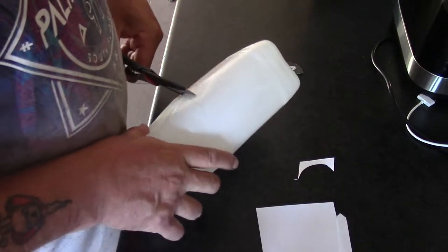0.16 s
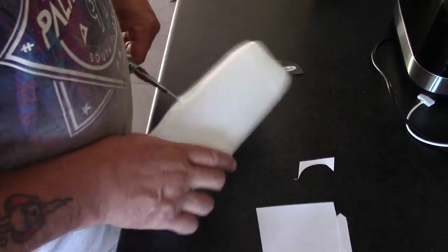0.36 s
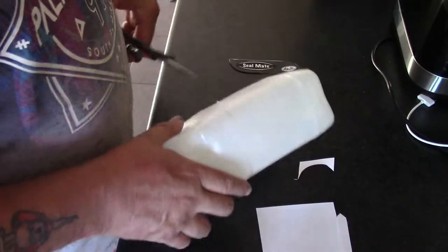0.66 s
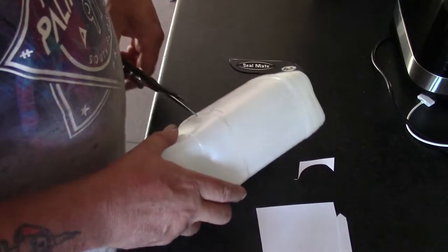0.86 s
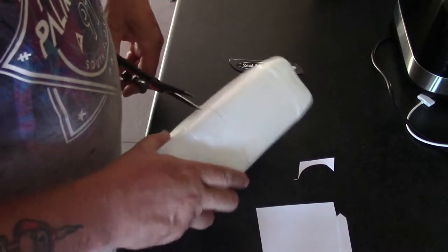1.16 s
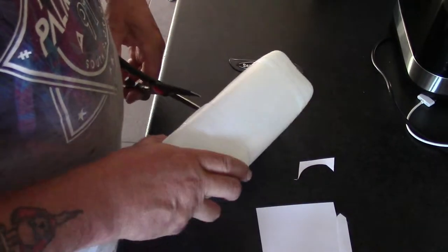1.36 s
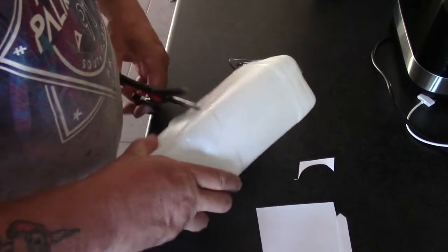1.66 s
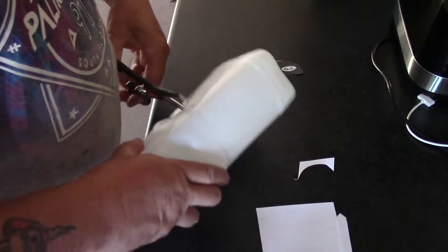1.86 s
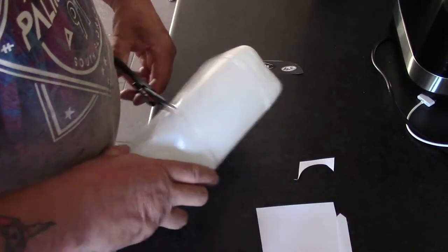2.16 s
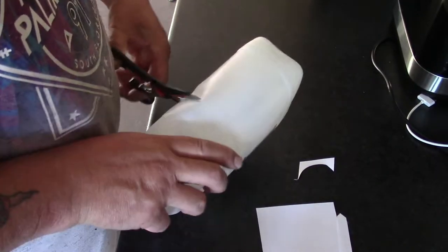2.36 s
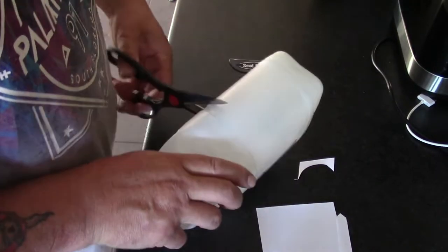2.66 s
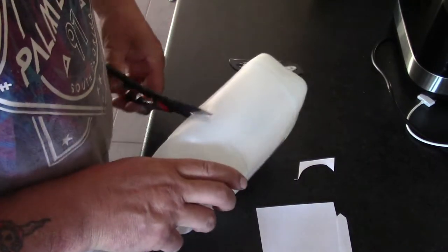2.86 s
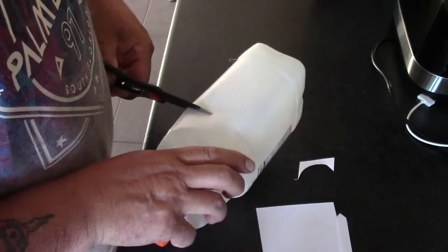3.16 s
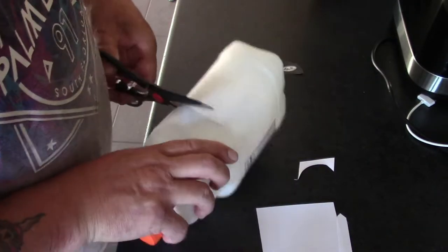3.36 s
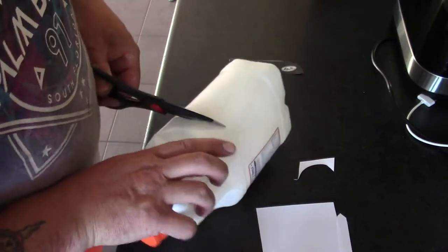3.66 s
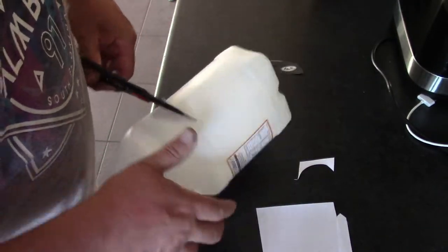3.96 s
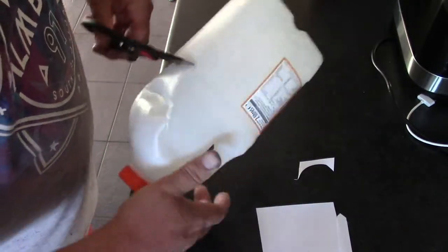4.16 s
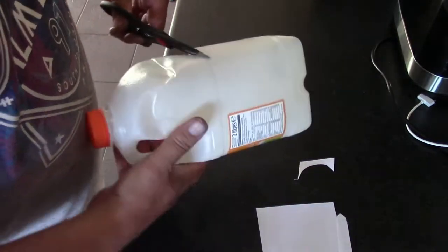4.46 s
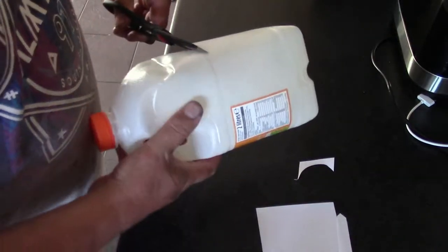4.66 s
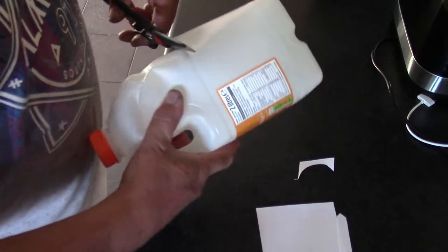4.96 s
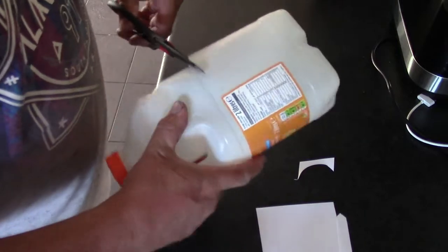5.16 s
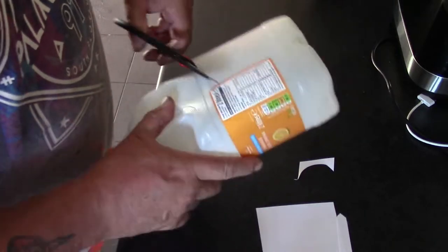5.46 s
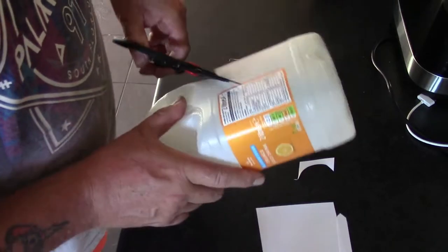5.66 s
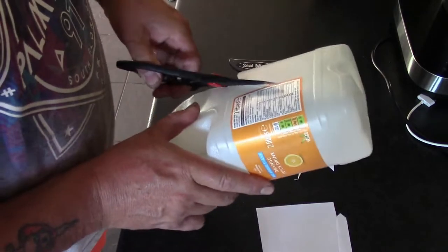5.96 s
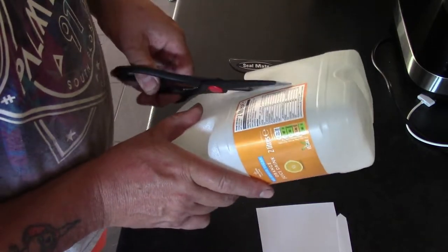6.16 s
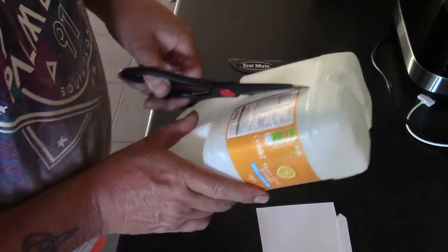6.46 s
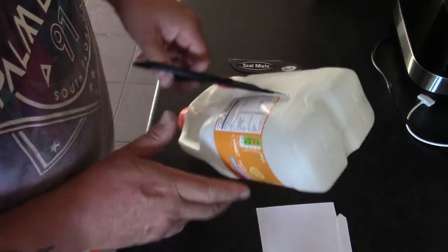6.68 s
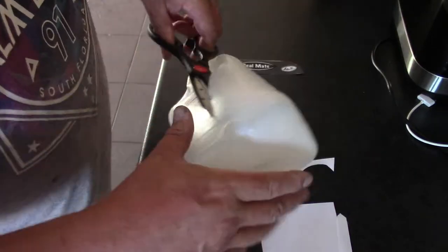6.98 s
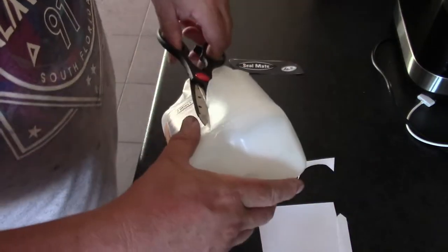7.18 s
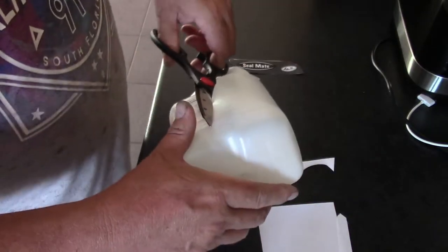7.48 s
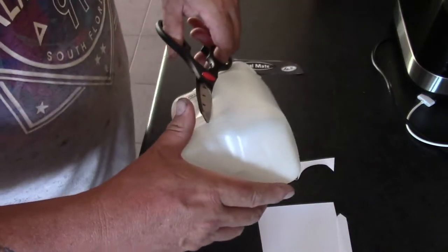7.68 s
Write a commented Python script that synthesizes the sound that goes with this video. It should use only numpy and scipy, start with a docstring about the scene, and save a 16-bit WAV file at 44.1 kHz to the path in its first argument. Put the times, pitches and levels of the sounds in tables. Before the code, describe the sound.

Irregular crunching and sudden hollow snaps come from an empty plastic jug being cut with scissors, about an arm's length from the microphone. Loud cracks arrive in clusters from the start, with fine crackling and a few brief metallic blade slides between them, then ease into gentler tearing and one last strong snap. The kitchen rings briefly after each break, over a faint steady hush.

```python
"""Thin plastic crunches, then snaps loudly: scissors cut an empty jug at arm's length in a hard kitchen.
The wall snaps and tears; each break booms in the hollow body, rattles the wall and cracks at the
blade tips. Between breaks the wall crunches in tiny slips and the steel blades slide on each other.
The room rings on over a faint hush."""
import sys
import numpy as np
from scipy import signal
from scipy.fft import rfft, irfft
from scipy.io import wavfile
from scipy.ndimage import uniform_filter1d

SR = 44100
rng = np.random.default_rng(int(sys.argv[2]) if len(sys.argv) > 2 else 0)


def unload_wav(signal):
    """Save mono or channel-first audio to the path in sys.argv[1] as 16-bit WAV at rate SR, clipped to [-1, 1]."""
    wavfile.write(
        sys.argv[1],
        SR,
        np.round(np.clip(np.atleast_2d(signal).T, -1, 1) * 32767).astype(np.int16),
    )


N = 344862


def undb(db):
    """dB to amplitude gain."""
    return 10 ** (np.asarray(db) / 20)


def level(x, db):
    """Scale to an rms level."""
    return x * undb(db) / np.sqrt(np.mean(x ** 2))


def curve(rows, column):
    """Table column, interpolated per sample."""
    rows = np.array(rows)
    return np.interp(np.arange(N) / SR, rows[:, 0], rows[:, column])


def wander(rate_hz):
    """Random levels, held and slewed; spread near 1."""
    hold = int(SR / rate_hz)
    steps = np.repeat(rng.standard_normal(N // hold + 1), hold)
    return uniform_filter1d(steps, size=hold // 2)[:N]


def grit(shape, rate_hz, spread_db):
    """Tiny slips of random sign, a few much larger than the rest."""
    slips = (rng.random(shape) < rate_hz / SR) * rng.standard_normal(shape)
    return slips * undb(spread_db * rng.exponential(size=shape))


def soften(x, cutoff_hz):
    """Low-pass: a broad, blunt push carries no treble."""
    return signal.lfilter(*signal.butter(2, cutoff_hz, fs=SR), x, axis=-1)


def ring(x, modes, near_hz=None, db_per_oct2=0, flip_chance=0):
    """Sum of resonances; a blow drives modes far from near_hz less, and some in reverse."""
    out = 0
    for k, (hz, width_hz, db) in enumerate(modes):
        gain = (-1) ** k * undb(db)
        if near_hz is not None:
            octaves = np.log2(hz / near_hz[:, None])
            polarity = np.sign(rng.random((len(x), 1)) - flip_chance)
            gain = gain * undb(-db_per_oct2 * octaves ** 2) * polarity
        out = out + gain * signal.lfilter(*signal.iirpeak(hz, hz / width_hz, SR), x, axis=-1)
    return out


# noise floor spectrum: (frequency [Hz], relative density [dB])
HUSH_SPECTRUM = [(30, -10), (100, -12), (190, -15), (350, -8), (850, -10), (1800, -10.5), (4000, -14.5),
                 (10000, -31), (16000, -34)]


def hush():
    """Room tone and hiss: steady shaped noise."""
    hz, db = np.transpose(HUSH_SPECTRUM)
    bin_hz = np.fft.rfftfreq(N, 1 / SR) + 1
    gain = undb(np.interp(np.log(bin_hz), np.log(hz), db))
    return level(irfft(rfft(rng.standard_normal(N)) * gain, N), db=-54)


# room decay: (band [Hz], T60 [s])
ROOM_DECAY = [(150, 0.33), (400, 0.54), (1200, 0.57), (3500, 0.56), (9000, 0.17), (14000, 0.29)]


def echoes():
    """Dense echoes start after the first wall and die band by band."""
    t, tail = np.arange(SR) / SR, 0
    for hz, t60_s in ROOM_DECAY:
        bandpass = signal.butter(1, [hz / 1.37, min(hz * 2.4, .45 * SR)], "band", fs=SR)
        band = signal.lfilter(*bandpass, rng.standard_normal(SR))
        tail = tail + band * undb(-60 * t / t60_s)
    tail *= np.clip((t - .003) / .0064, 0, 1)
    return tail / np.sqrt(np.mean(tail[SR // 100:SR // 25] ** 2) * SR / 25)


def room(x, tails=16, gain_db=-9.5):
    """Room echo, crossfaded between random tails so it sounds smooth rather than metallic."""
    tail_index = np.arange(N) / N * (tails - 1)
    fades = (np.cos(np.pi / 2 * np.clip(tail_index - k, -1, 1)) for k in range(tails))
    return undb(gain_db) * sum(signal.fftconvolve(x * fade, echoes())[:N] for fade in fades)


# blade resonances: (frequency [Hz], width [Hz], gain [dB])
STEEL_MODES = [(2700, 1100, 12.6), (3780, 990, 14.5), (5660, 260, 11), (6950, 2300, 2.3), (9800, 1500, 2.6),
               (10600, 950, 1.2)]
# blade on blade: (start [s], end [s], level [dB])
BLADE_SLIDES = [(0.005, 0.152, -46.5), (.74, 1.1, -39.5), (4.32, 4.617, -52), (5.583, 5.803, -47),
                (6.063, 6.1, -49.5), (6.393, 6.46, -56.5), (7.43, 7.547, -50.5)]


def blades(attack_s=.064, release_s=.13):
    """Fine rubbing rings the steel in bands with dark gaps between them."""
    t = np.arange(N) / SR
    gain = sum(undb(db) * np.interp(t, [start - attack_s, start, end, end + release_s], [0, 1, 1, 0])
               for start, end, db in BLADE_SLIDES)
    rub = grit(N, rate_hz=9000, spread_db=.76)
    # two passes per mode deepen the gaps
    steel = sum(ring(ring(rub, [(hz, width, 0)]), [(hz, width, db)]) for hz, width, db in STEEL_MODES)
    return uniform_filter1d(gain, size=1500) * level(steel, 0)


# body (boom), wall (rattle), edge (crack) modes: (frequency [Hz], width [Hz], gain [dB])
BODY_MODES = [(169, 122, -8.5), (283, 48, -6.5), (375.2, 49.7, 4.5), (417.6, 68, -2.5), (533, 110, -7.5),
              (596.7, 117, -3.5), (769, 65, -4), (931, 200, -2.5)]
WALL_MODES = [(907, 300, 9.5), (1161, 210, 7.5), (1546, 323, 1.5), (2040, 310, -0.5), (2013, 49, -5),
              (2264, 86, -1.5), (2620, 1200, -0.5), (3600, 2370, -0.5)]
EDGE_MODES = [(3950, 1560, 4), (5650, 1920, 3), (7370, 1750, 0.5), (9480, 2730, -2), (12000, 3000, -22),
              (14000, 4800, -23.5)]
# steady crunch of wall and hands: (time [s], boom level [dB], brightness [dB per part])
STEADY_CRUNCH = [(0, -29, -1), (.2, -59.5, 11.5), (.45, -36, -7), (.62, -43.5, 6.5), (1.1, -39, 0),
                 (1.46, -59, 11), (1.62, -41.5, -3), (1.9, -49.5, 1.5), (2.07, -67, -1.5), (2.2, -50, -5),
                 (2.55, -39.5, 5.5), (2.77, -26.5, -2.5), (3.1, -58, 7.5), (3.3, -43, 2), (3.75, -30, 0),
                 (4.04, -41, -6), (4.3, -40, 4.5), (4.62, -53, 0), (4.83, -29, 2), (5.12, -33, -1.5),
                 (5.45, -37.5, 3.5), (6.14, -39.5, 5.5), (6.25, -51, -14), (6.5, -29.5, 0),
                 (6.77, -52, 3.5), (7.05, -50.5, 3), (7.32, -35, 0), (7.64, -58.5, 9), (7.82, -70, 1)]


def crunch(swell_db=3, settle_peak_s=.024):
    """One stream of slips shakes body, wall and edge, harder while the wall settles after a break."""
    grip = undb(swell_db * wander(rate_hz=25))  # the grip shifts, so the crunch comes and goes
    slips = grit(N, rate_hz=5000, spread_db=1.2) * grip
    boom = ring(soften(slips, cutoff_hz=1570), BODY_MODES)
    rattle = ring(soften(slips, cutoff_hz=3700), WALL_MODES)
    crack = ring(slips, EDGE_MODES)
    start_s, *break_db = BREAKS.T[:4]
    starts = (start_s * SR).astype(int)
    age = np.arange(SR // 2) / SR / settle_peak_s
    settle_shape = (age * np.exp(1 - age)) ** 2
    steady_db, bright_db = curve(STEADY_CRUNCH, 1), curve(STEADY_CRUNCH, 2)
    parts = (boom, 0, -17), (rattle, -9.5, -11), (crack, -21, -26.5)
    out = 0
    for k, (part, steady_offset_db, settle_offset_db) in enumerate(parts):
        impulses = np.bincount(starts, undb(2 * (break_db[k] + settle_offset_db)), N)
        settle_power = np.abs(signal.fftconvolve(impulses, settle_shape)[:N])
        steady_power = undb(2 * (steady_db + steady_offset_db + k * bright_db))
        out = out + np.sqrt(steady_power + settle_power) * level(part, 0)
    return out


# boom centre, sinking while the cut runs past the handle: (time [s], frequency [Hz])
BOOM_CENTRE = [(0, 592), (2.5, 613), (4.2, 518), (5.4, 565), (5.8, 430), (7.0, 486), (7.4, 580)]
# sudden snaps: (time [s], boom [dB], rattle [dB], crack [dB], rattle centre [Hz], crack decay [ms])
WALL_SNAPS = [(.024, -25, -29.5, -44, 1690, 8.1), (.218, -14, -13, -37, 1980, 14.4),
              (.308, -14, -22.5, -32, 2040, 9), (.384, -10, -12, -19, 1220, 14),
              (.403, -15, -14.5, -44, 1390, 8.1), (.534, -36, -32, -44, 1650, 8),
              (.685, -38, -34.5, -55, 1350, 6.1), (.811, -33, -33, -51, 2100, 11),
              (.882, -24.5, -25.5, -36.5, 1730, 6.9), (1.18, -12.5, -16.5, -30, 1690, 3),
              (1.212, -17, -18, -40, 1970, 6.5), (1.352, -33.5, -27, -56, 1570, 4.8),
              (1.505, -38, -29.5, -37, 2970, 2.9), (1.518, -29.5, -13.5, -13, 2630, 11),
              (1.59, -23, -25, -45, 1870, 9.1), (1.753, -23.5, -34, -62, 1740, 20),
              (1.781, -20.5, -25, -37, 1590, 7.5), (2.021, -47, -58, -58, 2230, 6),
              (2.099, -71, -55, -57, 1400, 7), (2.112, -8.5, -13.5, -26.5, 1130, 7.2),
              (2.222, -22, -27, -37, 2170, 5.3), (2.246, -23, -28.5, -39, 1770, 19),
              (2.281, -26.5, -29, -49, 1740, 3), (2.443, -27, -27, -38, 1850, 4.4),
              (2.623, -30, -26, -40, 2510, 4), (2.692, -10.5, -12, -13, 2620, 7.7),
              (2.711, -22, -16, -16.5, 2360, 15), (3.033, -25, -61, -49, 1620, 7.1),
              (3.137, -13, -19.5, -23.5, 1270, 8), (3.198, -12, -17.5, -26.5, 1720, 3.3),
              (3.588, -30, -29.5, -35, 1410, 11), (3.644, -15, -19.5, -25.5, 1780, 8.3),
              (3.743, -25.5, -33, -44, 1960, 8.5), (3.8, -52, -53, -44, 1770, 9.6),
              (3.869, -23, -25, -37.5, 1560, 8.5), (3.886, -16.5, -23.5, -40, 1260, 10),
              (3.906, -13, -31, -48, 1500, 4.4), (4.006, -28, -55, -72, 1060, 4.1),
              (4.074, -29, -22.5, -24, 2330, 7.2), (4.252, -32.5, -29.5, -60, 1530, 5.7),
              (4.272, -32, -42, -66, 1640, 4.2), (4.311, -35, -36, -37, 1920, 5.9),
              (4.336, -28.5, -57, -70, 1750, 14), (4.475, -29.5, -39, -56, 1500, 10),
              (4.642, -29.5, -34.5, -43.5, 2000, 35), (4.671, -9.5, -8.5, -22.5, 1550, 4),
              (4.855, -12, -14.5, -59, 1320, 4.5), (4.889, -13, -28, -48, 1810, 7.9),
              (5.136, -15.5, -10.5, -16, 1800, 7.3), (5.168, -10, -12.5, -17, 1510, 11.6),
              (5.398, -28, -18, -38, 2040, 4), (5.491, -42, -45, -41, 2000, 6),
              (5.561, -21.5, -33, -43.5, 1550, 7.7), (5.735, -38.5, -43, -46, 1920, 18),
              (5.948, -46, -44, -62, 1430, 6), (6.157, -56, -42, -39, 2270, 3.7),
              (6.197, -39.5, -40, -42.5, 2040, 6), (6.476, -28, -33, -35, 1630, 19),
              (6.615, -34, -45, -50.5, 1450, 18), (6.726, -55, -48, -55, 1490, 4.5),
              (6.789, -38.5, -48, -70, 1910, 8.5), (7.078, -35.5, -42.5, -49, 2300, 9.8),
              (7.103, -33, -32.5, -45.5, 1860, 5.6), (7.262, -30.5, -41, -51, 1300, 37),
              (7.343, -12.5, -24, -67, 1190, 4.4)]
# tears that build up: (time [s], boom [dB], rattle [dB], crack [dB], rattle centre [Hz], rise [s])
WALL_TEARS = [(.268, -25, -25, -38, 1650, .01), (.57, -58, -55, -47, 2010, 0.014),
              (.42, -19.5, -18.5, -46, 1420, 0.047), (1.031, -31.5, -30, -48, 2820, 0.02),
              (1.075, -29, -28, -39, 1860, 0.027), (1.165, -16.5, -28, -38, 1670, 0.023),
              (1.875, -29, -37, -48, 1660, .017), (1.895, -26.5, -35.5, -43.5, 1460, 0.023),
              (2.126, -12.5, -17.5, -24.5, 1750, 0.005), (2.481, -47, -50, -50, 1650, 0.017),
              (2.52, -55, -52, -55, 1900, .02), (2.594, -26.5, -26.5, -33.5, 2560, 0.019),
              (2.856, -28, -27, -33.5, 2290, 0.015), (2.91, -36, -35, -42.5, 2040, 0.021),
              (3.047, -48, -40.5, -41.5, 1890, 0.019), (3.299, -17.5, -22.5, -33, 1600, 0.03),
              (3.335, -16.5, -17, -25.5, 1850, 0.034), (3.431, -25.5, -25.5, -39, 1660, 0.025),
              (3.455, -33.5, -40, -40.5, 1700, 0.017), (3.558, -48, -54.5, -45, 1600, 0.021),
              (3.7, -26, -28, -37, 1580, 0.014), (4.404, -27, -36.5, -47, 1900, 0.024),
              (4.694, -26, -23.5, -59, 1760, .015), (4.872, -27, -32, -45, 1800, 0.018),
              (4.934, -18.5, -17.5, -30, 2000, 0.014), (4.96, -17.5, -45, -36, 1650, 0.003),
              (5.089, -29, -48, -71, 1700, 0.013), (5.346, -21, -14, -26, 2070, 0.017),
              (5.352, -25.5, -19, -34, 1700, 0.014), (5.365, -24.5, -12.5, -27, 2000, 0.036),
              (5.75, -34, -42, -45.5, 1860, 0.031), (5.84, -29, -32.5, -43, 1850, 0.022),
              (5.868, -31.5, -39.5, -50, 1790, 0.028), (6.08, -35, -36, -39, 1680, 0.022),
              (6.271, -21, -22.5, -29, 1980, 0.038), (6.304, -22.5, -24.5, -57, 1730, 0.02),
              (6.379, -33, -46, -45, 1710, 0.021), (6.431, -24.5, -37, -40.5, 1680, 0.032),
              (6.489, -33, -31, -43, 1300, 0.0103), (6.579, -40, -39, -51, 1360, 0.038),
              (7.124, -32.5, -45, -51, 1950, 0.02), (7.291, -34, -29, -47, 1700, 0.037)]
SNAP_RISE_S, TEAR_DECAY_S = .0015, .012
BREAKS = np.array([(*row, SNAP_RISE_S, decay_ms / 1000) for *row, decay_ms in WALL_SNAPS]
                  + [(*row, TEAR_DECAY_S) for row in WALL_TEARS])


def wall_breaks():
    """Slips build up, break and die away; where the blades bite decides which modes speak."""
    start_s, boom_db, rattle_db, crack_db, rattle_hz, rise_s, decay_s = BREAKS.T
    rise_s, decay_s = rise_s[:, None], decay_s[:, None]
    boom_hz = np.interp(start_s, *np.transpose(BOOM_CENTRE))
    crack_hz = 6420 * 2 ** (-.015 * (crack_db + 34.5))  # fainter cracks are thinner and sit higher
    t = np.arange(SR // 5) / SR
    build_up = np.clip(t / rise_s, 0, 1) ** (.26 + rise_s / .067)
    slips = grit((len(start_s), len(t)), rate_hz=9000, spread_db=1.66) * build_up
    age = np.clip(t - rise_s, 0, None) / decay_s
    # only a sudden break kicks the whole body at once
    kick = (t == 0) * np.exp(-(rise_s / .003) ** 2)
    body_push = soften(8 * kick + slips * np.exp(-age / 1.88), cutoff_hz=1035)
    wall_push = soften(5 * kick + slips * np.exp(-age / 1.46), cutoff_hz=6000)
    edge_push = 5 * kick + slips * np.exp(-age)
    boom = ring(body_push, BODY_MODES, boom_hz, db_per_oct2=15.2, flip_chance=.33)
    rattle = ring(wall_push, WALL_MODES, rattle_hz, db_per_oct2=10.8, flip_chance=.2)
    crack = ring(edge_push, EDGE_MODES, crack_hz, db_per_oct2=8)
    peak_window = (t >= .8 * rise_s) & (t < .8 * rise_s + .01)
    sounds = 0
    for part, db in ((boom, boom_db), (rattle, rattle_db), (crack, crack_db)):
        peak_rms = np.sqrt(np.sum(part ** 2 * peak_window, axis=1) / peak_window.sum(axis=1))
        sounds = sounds + part * (undb(db) / peak_rms)[:, None]
    out = np.zeros(N + SR)
    for start, sound in zip(start_s, sounds):
        out[int(start * SR):][:len(t)] += sound
    return out[:N]


def scene():
    """Jug and blades, their echoes and the room tone; mono."""
    # a body this small and light radiates little below its first air mode
    radiation = signal.butter(3, 230, "high", fs=SR, output="sos")
    jug = signal.sosfilt(radiation, wall_breaks() + crunch())
    direct = jug + blades()
    return (direct + room(direct) + hush())[None]


def record(dry):
    """Round the loudest peaks, thin the bass, cut the top."""
    bass_hz, top_hz = 110, 15900
    rounded = 1.014 * np.tanh(dry * 1.11)
    thinned = signal.sosfilt(signal.butter(1, bass_hz, "high", fs=SR, output="sos"), rounded)
    return signal.sosfilt(signal.ellip(10, .2, 75, top_hz, fs=SR, output="sos"), thinned)


dry = scene()
out = record(dry)
unload_wav(out)
```